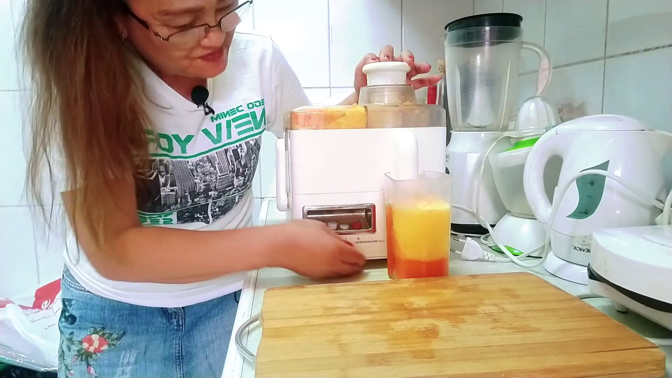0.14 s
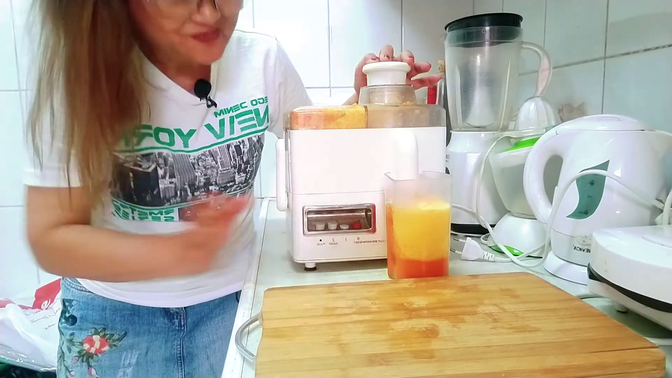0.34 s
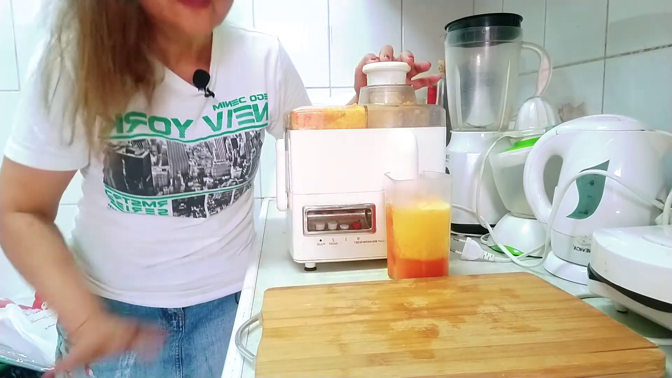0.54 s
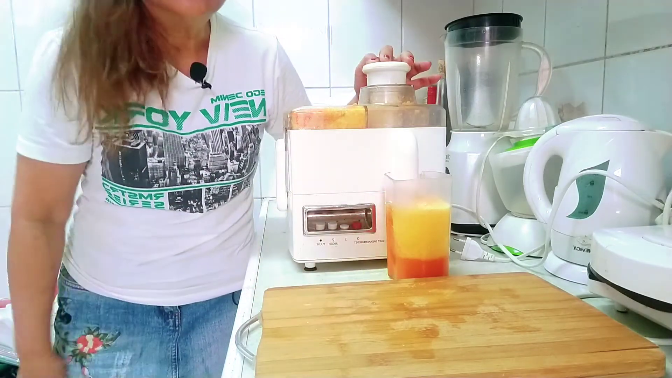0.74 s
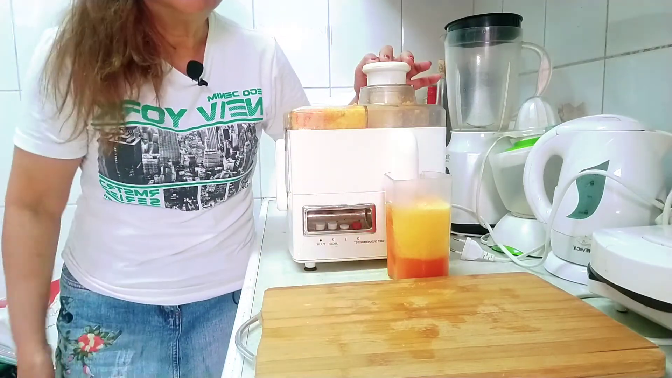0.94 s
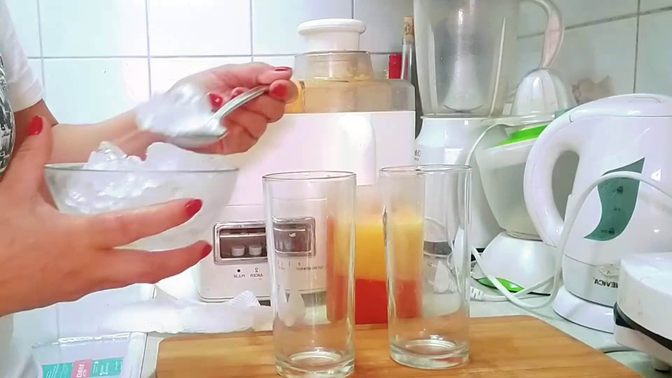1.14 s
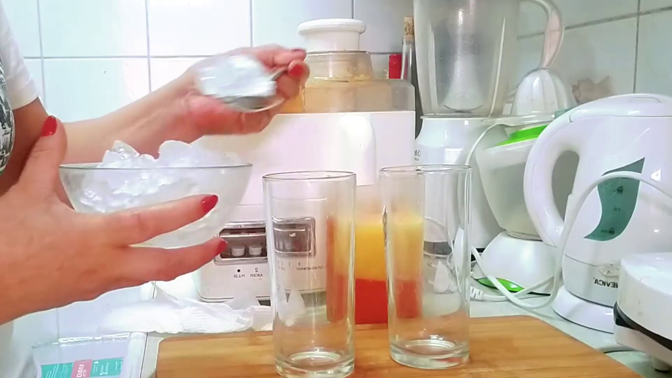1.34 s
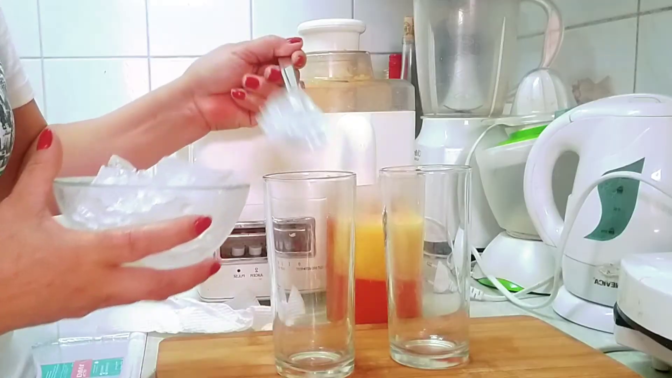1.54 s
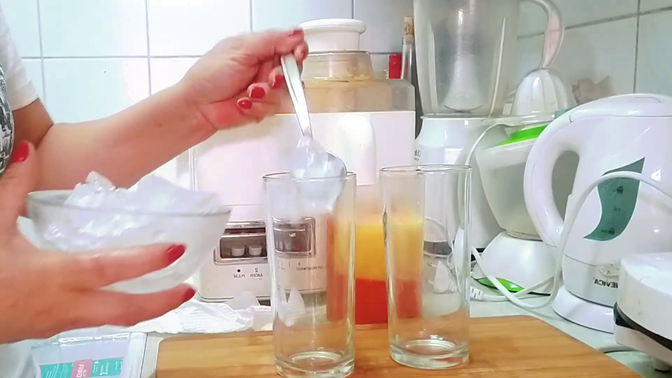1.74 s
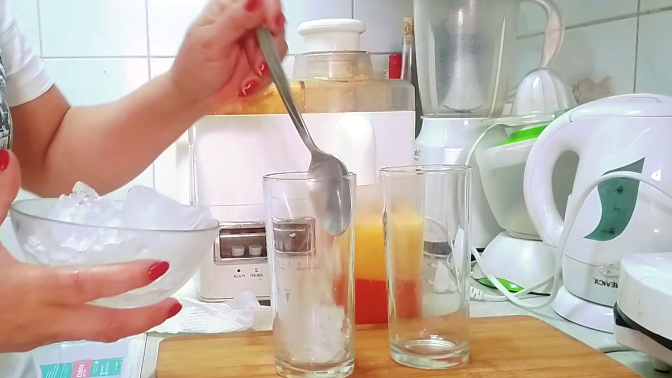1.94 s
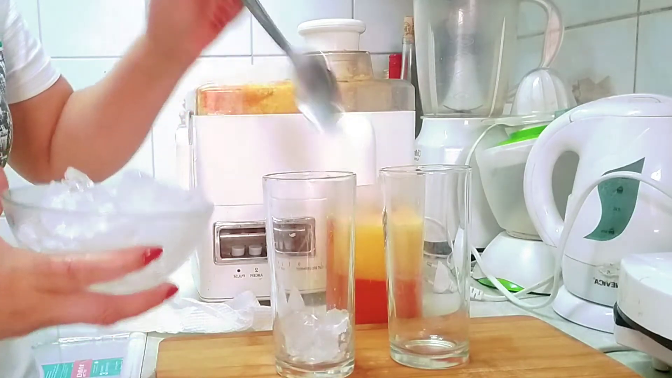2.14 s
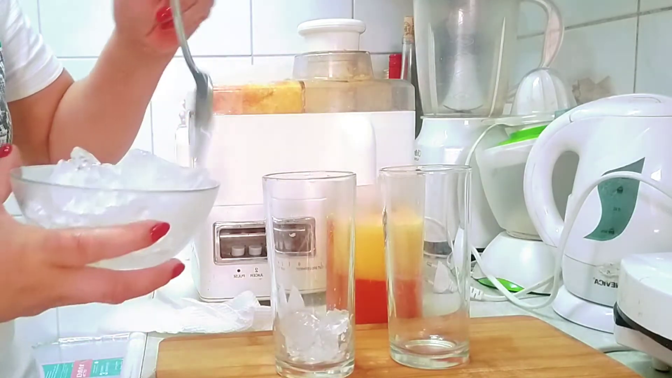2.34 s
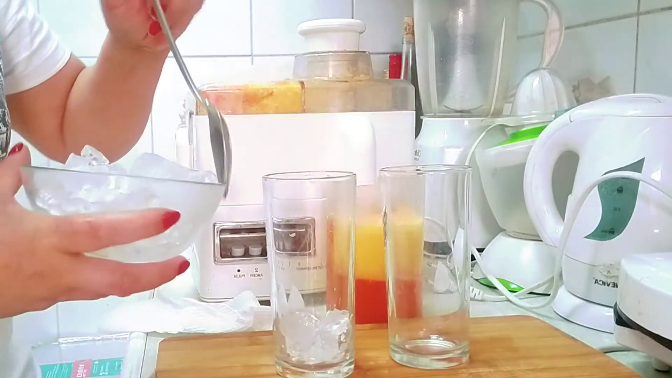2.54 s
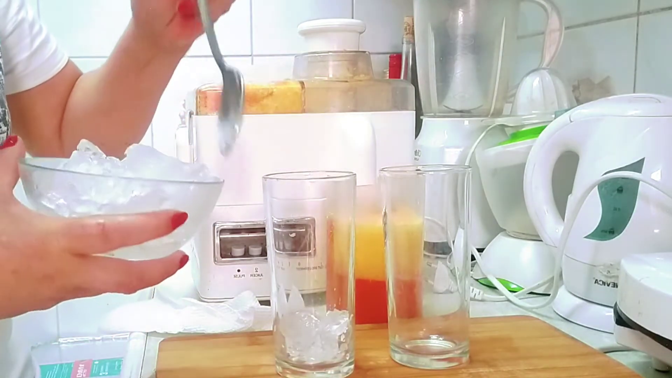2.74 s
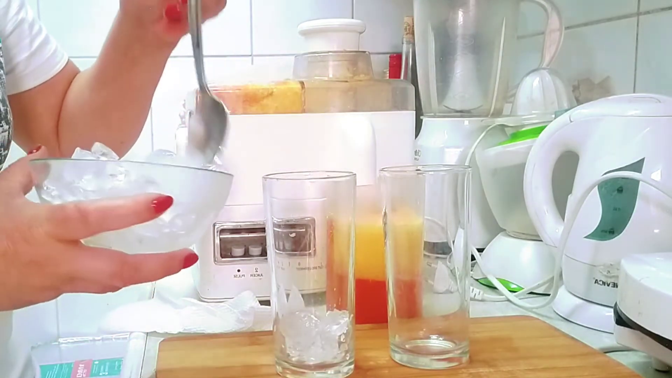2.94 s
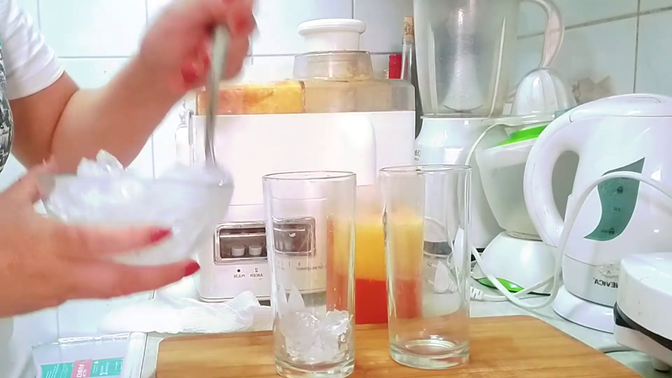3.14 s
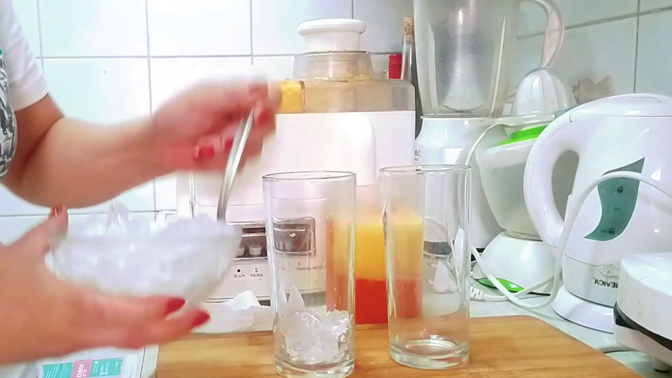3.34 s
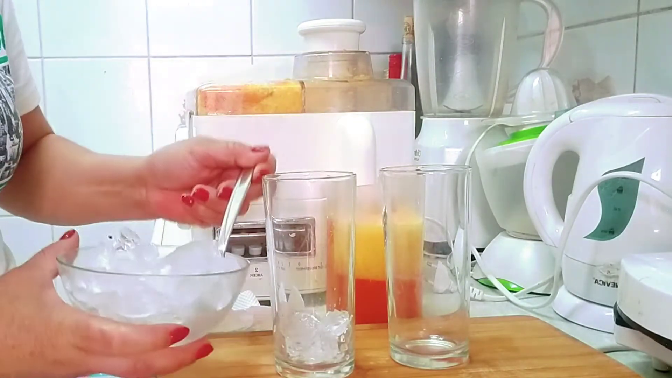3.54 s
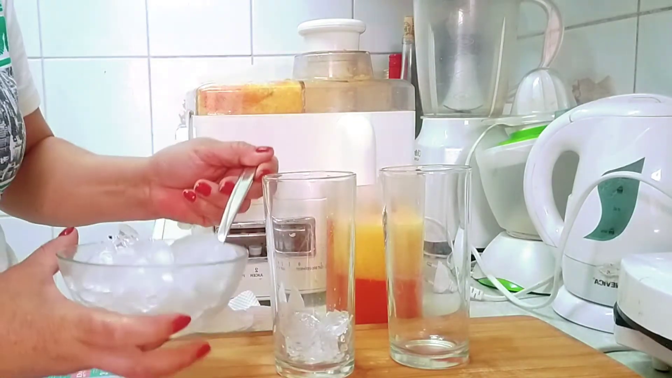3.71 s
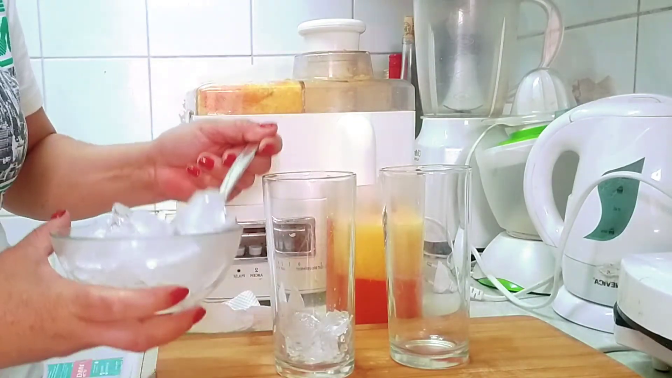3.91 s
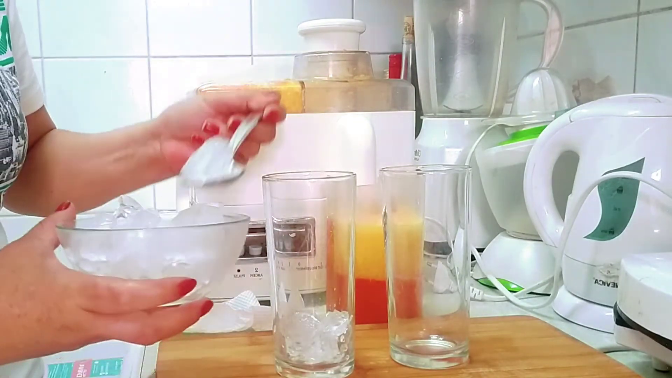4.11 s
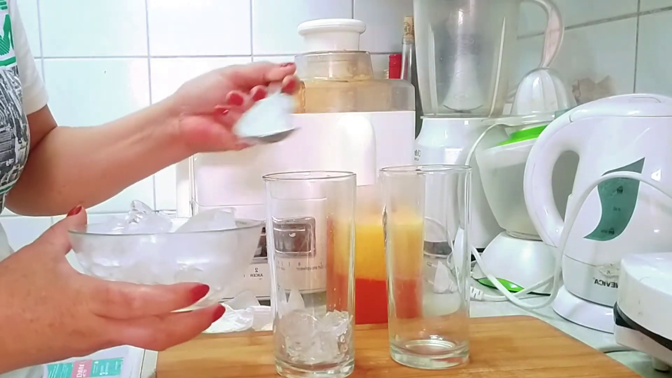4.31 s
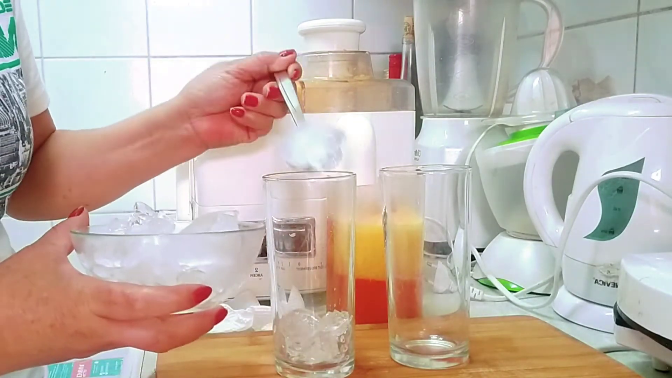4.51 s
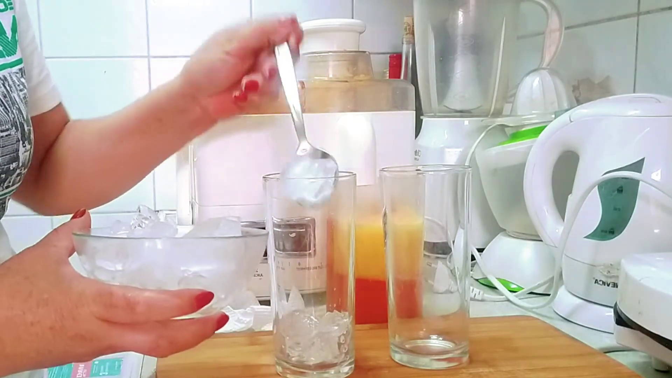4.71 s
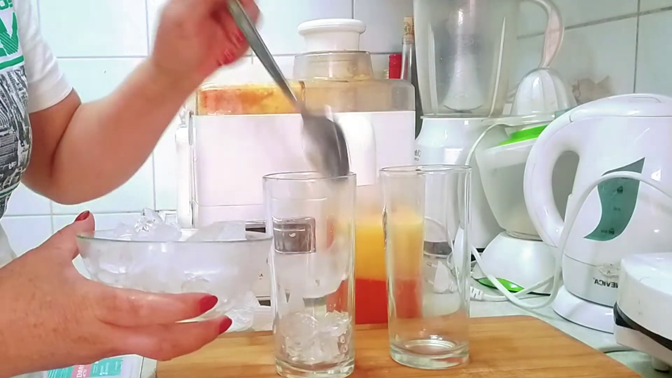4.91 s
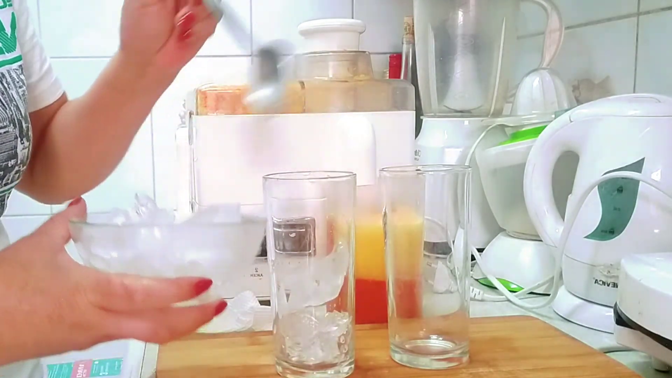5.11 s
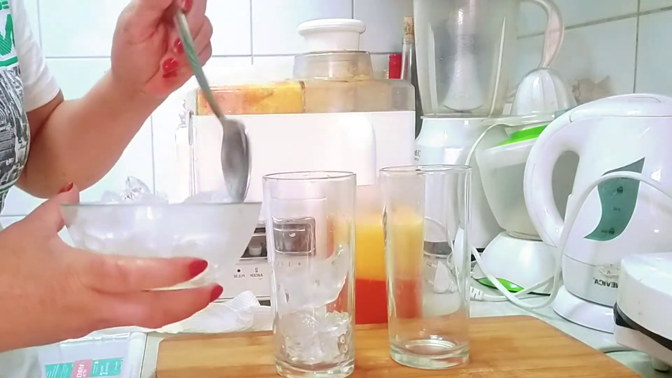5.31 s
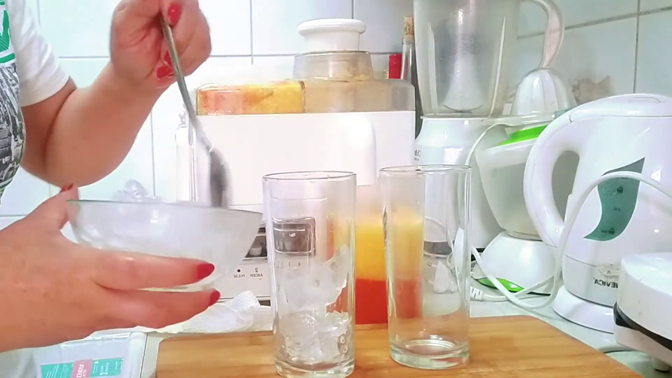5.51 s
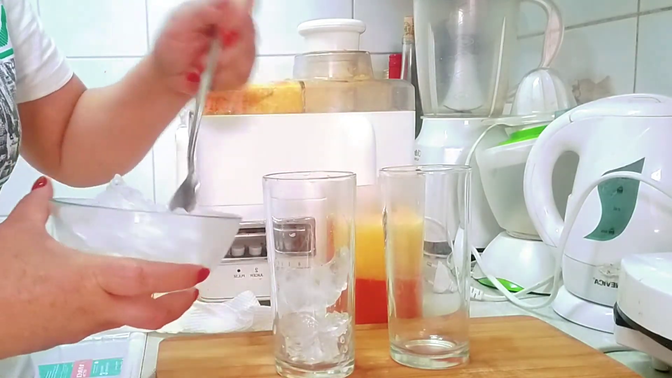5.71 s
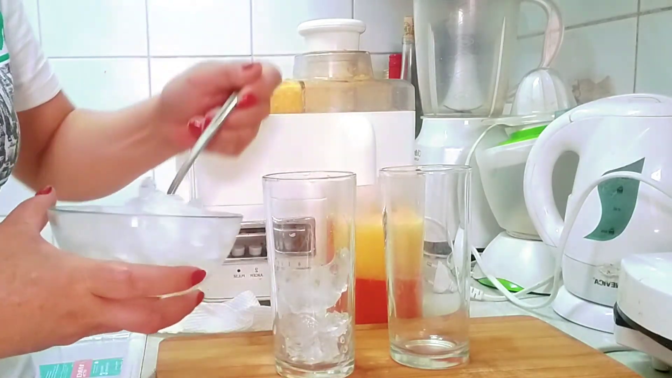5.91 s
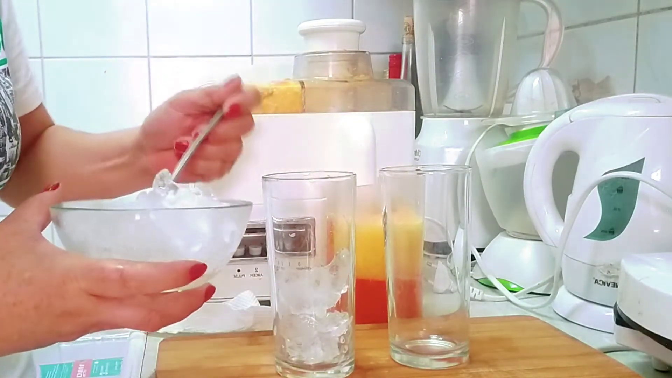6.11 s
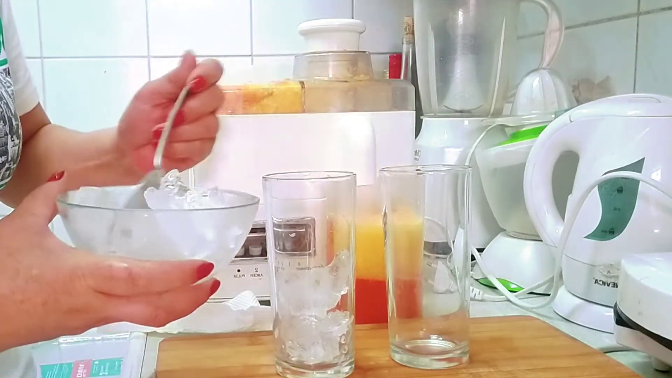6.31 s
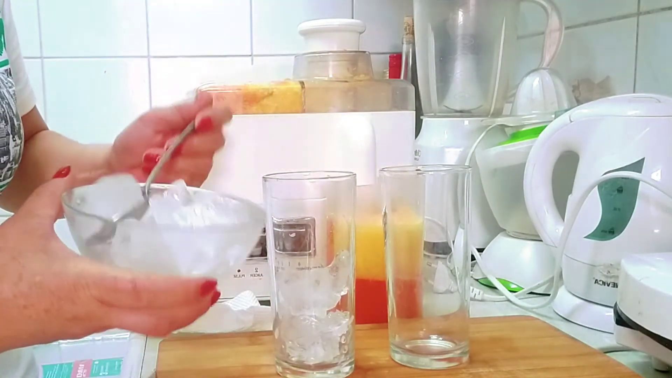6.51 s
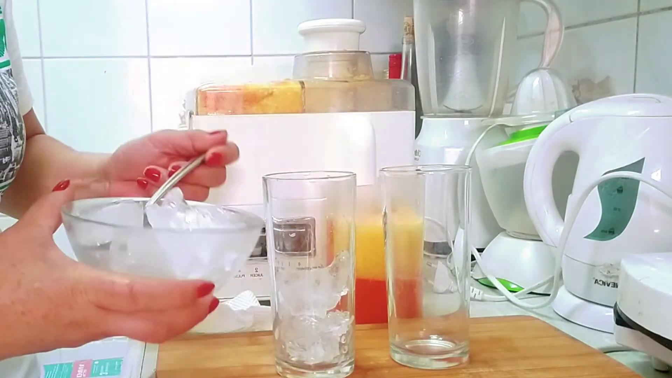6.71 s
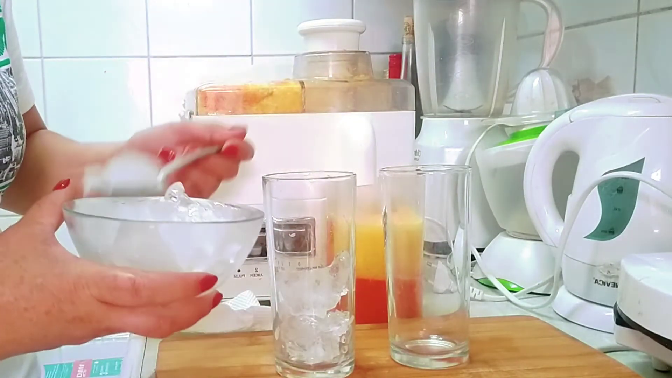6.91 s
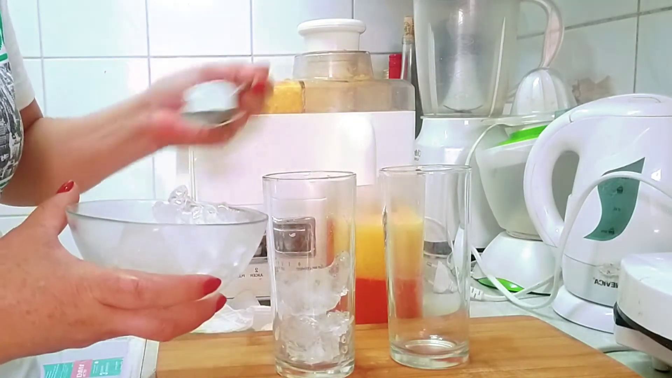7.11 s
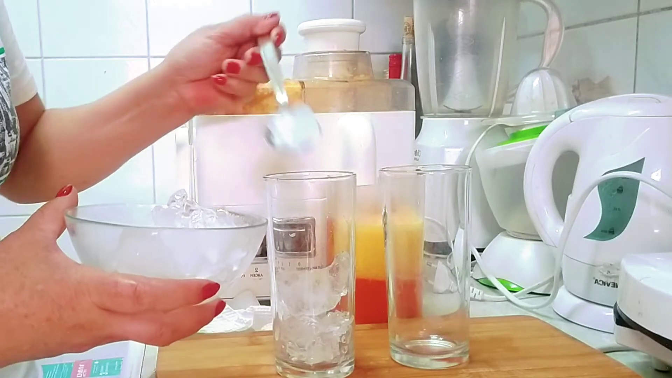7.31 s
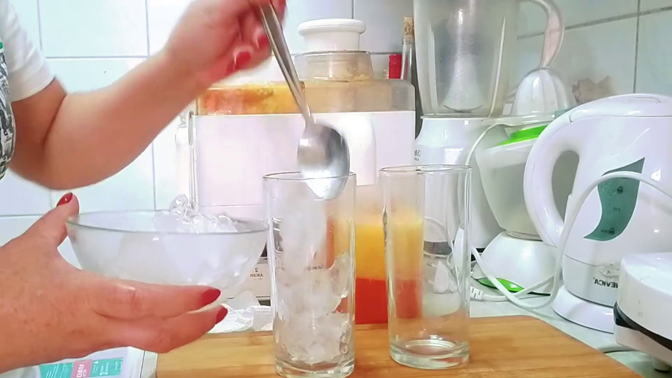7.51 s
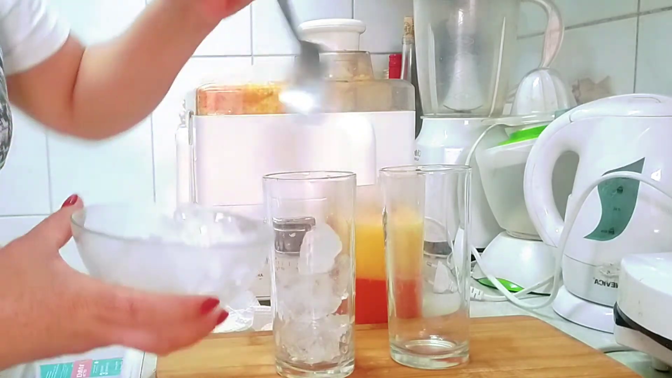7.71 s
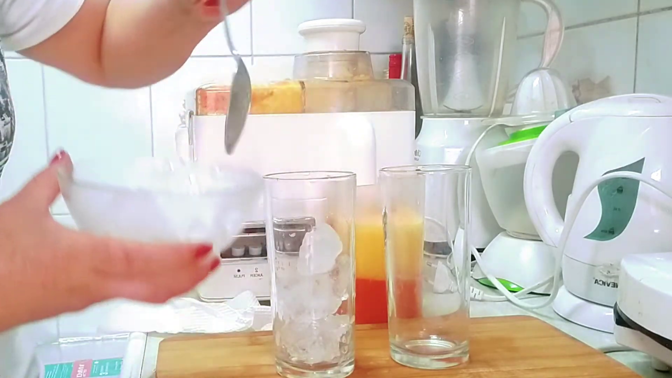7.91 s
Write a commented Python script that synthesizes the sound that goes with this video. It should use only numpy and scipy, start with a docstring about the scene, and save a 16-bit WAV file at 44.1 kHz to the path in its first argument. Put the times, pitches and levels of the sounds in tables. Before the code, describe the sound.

A juicer motor cuts off in a kitchen, followed by ice cubes rattling in a bowl and clinking into a glass three times.

```python
"""An electric juicer whines and churns on a kitchen counter, then falls silent all at once.
Its tones are harmonics of the shaft rotation, throbbing at twice the mains rate over rushing air.
A steel spoon then digs ice from a glass bowl and drops three spoonfuls into a tall tumbler.
Each impact cracks briefly and excites the modes of the glass, which ice against the wall damps.
The tiled kitchen adds a short bright tail and a faint steady background."""
import sys
import numpy as np
from scipy import signal
from scipy.fft import rfft, irfft, next_fast_len
from scipy.io import wavfile

SR = 44100
rng = np.random.default_rng(int(sys.argv[2]) if len(sys.argv) > 2 else 0)


def pcm_store(signal):
    """Save signal as 16-bit PCM."""
    levels = np.round(np.clip(np.atleast_2d(signal), -1, 1) * 32767)
    wavfile.write(sys.argv[1], SR, levels.astype(np.int16).T)


N = 350595
TIME = np.arange(N) / SR
RING_TIME = TIME[:24000]

# The juicer's run. Each row: time in seconds, machine and air levels in dB (used about their medians).
MOTOR_RUN = [(0.0, -35, -32), (0.03, -32.5, -33.5), (1.296, -33.5, -33), (1.35, -36, -34.5)]
# Motor tones; twelve rotor slots whine on multiples of 12.
# Each row: shaft order (rounded in use), level in dB, depth of the mains throb from 0 to 1.
SHAFT_HARMONICS = [(1.0004, -31.5, 0.05), (1.998, -49.5, 0.6), (3.01, -48.5, 0.9), (5.03, -71, 0.5),
                   (11.96, -40, 0.28), (24.06, -58, 0.2), (35.95, -46, 0.05), (50, -72, 0.9), (60, -64, 1.)]
# Mains hum and buzz of the housing. Each row: frequency in Hz, level in dB.
HOUSING_TONES = [(100.2, -46.5), (326.2, -54), (652.4, -53), (726.8, -51), (888.2, -47.5), (1011.5, -60),
                 (1063, -57), (1142.2, -46), (1482.5, -50.5)]
# Noise of the basket, its air and the room. Each row: frequency in Hz, relative density in dB.
CHURN_SPECTRUM = [(50, -28), (105, -8), (150, -12), (250, -3.5), (360, -11), (560, -8), (720, -3.5),
                  (1080, 2), (1320, -8), (2000, -11), (2600, -10), (3020, -14.5), (3300, -11), (3900, -30),
                  (6000, -31.5)]
AIR_SPECTRUM = [(2120, -36), (3600, -8.5), (4400, -9.5), (4830, -14), (5350, -10.5), (6050, -13),
                (7770, -9.5), (8060, -4), (8470, -9.5), (8730, -12), (10100, -15), (11100, -8), (12300, -8),
                (14900, -1), (15500, -2.5)]
ROOM_SPECTRUM = [(20, 1.5), (42, 5), (62, -14), (97, -1), (130, -3), (200, -7), (320, -11), (660, -14.5),
                 (900, -16), (1400, -19), (3200, -25), (5000, -36), (8200, -36), (15500, -32.5)]
# The room's hum. Each row: frequency in Hz, level in dB.
ROOM_HUM = [(46.3, -75), (95.8, -63), (191, -73.5), (289, -69), (813, -72.5)]
# Reverberation. Each row: frequency in Hz, time to decay by 60 dB (T60) in seconds.
KITCHEN_DECAY = [(150, 0.87), (1000, 0.55), (3000, 0.51), (8000, 0.45), (15000, 0.27)]
# Spoon and ice striking the tumbler.
# Each row: start in seconds, strength in dB, brightness in dB per octave, muting from 0 to 1.
TUMBLER_BLOWS = [(1.744, -16.5, -1, 0.2), (1.908, -35, 1.5, 0.93), (1.930, -27, -1, 0.3),
                 (1.984, -30, 1, 0.84), (2.053, -33.5, 4, 1), (2.065, -30, 6, 0.23), (2.087, -35, 3.5, 0.1),
                 (2.161, -40.5, 2, 0.9), (4.689, -19, -1, 0.36), (4.771, -28, -2, 0.37),
                 (4.842, -33, -2, 0), (4.886, -30, -1.5, 0.15), (4.928, -23.5, -0.5, 0.32),
                 (4.977, -32, -0.5, 0.28), (7.519, -24, 2, 0.7), (7.52, -30, 5.5, 0.68),
                 (7.573, -27.5, -2.5, 0.08), (7.585, -29.5, -2, 0.22), (7.596, -31.5, -3.5, 0.58),
                 (7.619, -31, -3, 0.05)]
# Modes of the tumbler, and of bowl and spoon.
# Each row: frequency in Hz, relative level in dB, nominal T60 in seconds.
TUMBLER_MODES = [(612, -24, .17), (2380, -12, .1), (2500, 1.5, .38), (2590, -10, .13), (2729, -11, .13),
                 (4385, -24, .2), (5680, -7, .14), (5729, -4, .45), (5780, -9, .2), (6195, -6, .36),
                 (6255, -11, .14), (9345, -10, .26), (10770, -12, .13), (11240, -6, .18), (11565, -7, .2),
                 (11685, -6, .11), (12800, -10, .13), (12965, -6, .17), (13070, -11, .17), (15233, 0, .2)]
BOWL_MODES = [(2110, -11, .16), (2225, 0, .27), (2450, -4, .2), (2821, -6, .18), (3950, -6, .22),
              (4107, -10, .2), (4344, -10, .2), (4820, -10, .22), (5995, -1.5, .28), (6130, -5, .22),
              (6638, -11, .25), (7219, -7, .25), (8400, -2, .3), (8570, -3, .32), (11735, -7, .3),
              (12670, -3, .3), (13770, -4, .2), (14400, -4, .2)]
# Noise of a contact, the board and sliding ice. Each row: frequency in Hz, relative density in dB.
CRACK_SPECTRUM = [(200, -6), (600, -8), (1200, -10.5), (2200, -4.5), (3300, -5.5), (5000, -8), (6200, -6),
                  (8300, -5), (9800, -15), (11500, -7.5), (14000, 1.5), (15500, -1.5)]
BOARD_SPECTRUM = [(40, -37), (72, 4), (130, -0.5), (180, -0.5), (260, -20.5), (450, -25), (900, -21.5),
                  (2000, -48.5)]
SLIDE_SPECTRUM = [(410, -62.5), (700, -12.5), (1520, -7.5), (1970, -8), (2460, -9), (2730, -7.5),
                  (5500, -22), (5940, -19), (8320, -13), (9980, -20.5), (15500, -9.5)]
# Short hollow notes of the tumbler's foot and of the cubes.
# Each row: start in seconds, frequency in Hz, level in dB.
CLUNKS = [(1.912, 1460, -44), (1.985, 1710, -38.5), (2.055, 667, -40.5), (2.067, 1660, -42.5),
          (2.158, 675, -42.5), (4.870, 607.5, -41), (7.520, 658, -38), (7.595, 1595, -31)]
# Cubes settling in the tumbler and stirred in the bowl.
# Each row: start in seconds, length in seconds, relative level in dB.
SETTLING_SPELLS = [(1.905, .25, -34), (4.84, .19, -41.5), (7.51, .19, -43)]
STIRRING_SPELLS = [(3.15, 1.22, -53.5), (5.58, 0.22, -54), (5.8, .36, -48.5), (6.3, 0.46, -54),
                   (7.0, .15, -56.5)]
# The spoon tapping the bowl. Each row: start in seconds, strength in dB, brightness in dB per octave,
# frequency in Hz that the struck spot favours.
SPOON_TAPS = [(2.466, -47.5, -6, 2160), (2.569, -32, -0.5, 2110), (2.778, -38.5, 2.5, 3980),
              (3.026, -49.5, -7, 2450), (3.206, -32, -0.5, 2090), (4.004, -37, 2.5, 2225),
              (5.363, -37, -2, 4200), (5.459, -32, 3.5, 6100), (6.216, -33.5, -4.5, 3840),
              (6.42, -44, -5.5, 2150), (6.607, -20.5, -1.5, 2350), (6.641, -24.5, -1.5, 5960),
              (6.970, -36.5, 4.5, 2040)]
# Cubes giving way. Each row: start in seconds, strength in dB, brightness in dB per octave.
ICE_CRUNCHES = [(3.072, -42, 0), (3.087, -23.5, 3.5), (3.677, -49.5, 3), (3.766, -46, -4), (3.876, -49, 3),
                (4.219, -40.5, -4.5), (5.532, -39.5, -0.5), (5.641, -48, 2), (5.675, -43.5, -5),
                (5.769, -48, -8.5), (5.84, -52.5, -11), (5.887, -32.5, -2), (5.978, -41, -0.5),
                (6.527, -41.5, -1.5), (6.568, -40.5, -5), (6.594, -44, 10), (6.705, -35.5, -2.5),
                (7.039, -50, -6.5), (7.241, -37, 2), (7.288, -38.5, -0.5)]
# How the filled bowl passes on a blow. Each row: frequency in Hz, gain in dB.
BOWL_RESPONSE = [(500, 0), (1400, 12.5), (2200, 13.5), (7000, 14), (13000, 10.5)]


def amp(db):
    """Amplitude grows tenfold with every 20 dB."""
    return 10 ** (np.asarray(db) / 20)


def unit(x):
    """Normalisation to an rms of 1."""
    return x / np.sqrt(np.mean(x ** 2) + 1e-20)


def read(points, hz):
    """Interpolation of (Hz, value) points on a log-frequency axis."""
    f, value = np.transpose(points)
    return np.interp(np.log(hz + 1), np.log(f + 1), value)


def colour(x, spectrum):
    """Minimum-phase filtering is causal, so clicks keep their sharp front."""
    size = next_fast_len(len(x) + 4096)
    hz = abs(np.fft.fftfreq(size, 1 / SR))
    log_gain = np.log(amp(np.maximum(read(spectrum, hz), -100)))
    response = np.exp(np.conj(signal.hilbert(log_gain)))[:size // 2 + 1]
    return irfft(rfft(x, size) * response, size)[:len(x)]


def drift(rate_hz):
    """Slow random fluctuation: low-passed noise of rms 1."""
    hz = np.fft.rfftfreq(N, 1 / SR)
    return unit(irfft(rfft(rng.standard_normal(N)) * np.exp(-(hz / rate_hz) ** 2), N))


def sine(turns):
    """Harmonic oscillation of rms 1 with a random initial phase."""
    return np.sqrt(2) * np.sin(2 * np.pi * (turns + rng.random()))


def add(mix, start_s, sound):
    """Superposition: a sound adds to the mix from its start time."""
    part = mix[max(round(start_s * SR), 0):][:len(sound)]
    part += sound[:len(part)]


def juicer(shaft_hz=226.1, mains_hz=50.1, silent_at_s=1.3943, fade_s=0.03):
    """Amplitude modulation: shaft harmonics and air throb at twice the mains rate over a churning basket."""
    times, machine_db, air_db = np.transpose(MOTOR_RUN)
    machine_gain, air_gain = (amp(np.interp(TIME, times, db - np.median(db)))
                              for db in (machine_db, air_db))
    turns = shaft_hz * TIME + 0.0034 * drift(1.7)
    throb = np.sin(2 * np.pi * 2 * mains_hz * TIME)
    flutter = 1 + 0.024 * drift(30)
    whine = flutter * sum(amp(db) * (1 + depth * throb) * sine(round(order) * turns)
                          for order, db, depth in SHAFT_HARMONICS)
    buzz = sum(amp(db) * sine(hz * TIME + 0.088 * drift(5.7)) for hz, db in HOUSING_TONES)
    # Reflections ripple both noise spectra.
    rumble, rush = (noise + 0.33 * kitchen_echo(noise) for noise in rng.standard_normal((2, N)))
    churn = amp(-32) * unit(colour(rumble, CHURN_SPECTRUM)) * (1 + 0.056 * drift(51))
    air = amp(-32.5) * unit(colour(rush, AIR_SPECTRUM)) * (1 + 0.036 * throb)
    running = np.clip((silent_at_s - TIME) / fade_s, 0, 1)
    return (machine_gain * (whine + buzz + churn) + air_gain * air) * running


def kitchen_echo(x, first_wall_s=0.0013):
    """Reverberation: dense reflections off the tiles decay exponentially, each band at its own rate."""
    hz, t, bands = signal.stft(rng.standard_normal(SR), SR, nperseg=256)
    decay = amp(-60 * t / read(KITCHEN_DECAY, hz)[:, None])
    tail = signal.istft(bands * decay, SR, nperseg=256)[1]
    tail *= TIME[:len(tail)] > first_wall_s
    return signal.fftconvolve(x, tail / np.linalg.norm(tail))[:N]


def room_tone(noise_db=-56.5):
    """Stationary noise lies under a hum that wavers by phase modulation."""
    hum = sum(amp(db) * sine(hz * TIME + 0.22 * drift(1.6)) for hz, db in ROOM_HUM)
    return amp(noise_db) * unit(colour(rng.standard_normal(N), ROOM_SPECTRUM)) + hum


def tumbler(thud_t60=0.5, bounce_db=-12):
    """Impact excitation: cubes ring the wall, thud through the foot into the board, bounce and settle."""
    out = np.zeros(N)
    for start, strength_db, brightness, muting in TUMBLER_BLOWS:
        add(out, start, clink(start, strength_db, brightness, muting))
        thud = unit(colour(rng.standard_normal(len(RING_TIME)), BOARD_SPECTRUM))
        thud_db = -41.5 + 0.37 * strength_db
        add(out, start, amp(thud_db - 60 * RING_TIME / thud_t60) * thud)
    for start, db in stray_contacts(SETTLING_SPELLS, count=4):
        add(out, start, clink(start, db + bounce_db, brightness=2, muting=0.85))
    for start, hz, db in CLUNKS:
        add(out, start, damped_note(hz, db, t60=0.1))
    return out + jostle(SETTLING_SPELLS, CRACK_SPECTRUM, ticks_per_s=400, spread_db=7, tick_t60=0.07)


def clink(start_s, strength_db, brightness, muting, spoonful_s=2.9, muted_crack_db=17):
    """Contact damping: ice against the wall shortens and detunes the ring and strengthens the crack."""
    # Filling shortens the ring further and chokes the modes near 5780 Hz.
    fill = (start_s - TUMBLER_BLOWS[0][0]) / spoonful_s
    sustain = (0.91 - 0.51 * muting) * 0.85 ** fill
    wall_response = [(600, -1.5), (2600, -4.5), (5780, -9 - 5 * fill), (6190, -3.5), (9300, -3.5)]
    modes = [(hz, db + read(wall_response, hz), t60 * sustain) for hz, db, t60 in TUMBLER_MODES]
    drive = blow_spectrum(strength_db, brightness)
    sound = ring(modes, drive, scatter_db=1.5, detune=0.0009 + 0.0062 * muting, beating=0.6)
    contact = colour(crack(t60=0.043), [(8000, -1), (13000, -3)])
    add(sound, 0, colour(contact, blow_spectrum(strength_db + muted_crack_db * muting, brightness)))
    return sound


def blow_spectrum(strength_db, brightness, pivot_hz=5500):
    """Spectral tilt: a contact leans to the treble by its brightness, in dB per octave."""
    hz = np.array([2200, 14000])
    return np.transpose([hz, strength_db + brightness * np.log2(hz / pivot_hz)])


def ring(modes, drive, scatter_db, detune, beating):
    """Modal superposition: the blow's spectrum and its landing spot set each decaying mode's level."""
    freqs, levels, t60s = np.transpose(modes)
    levels = levels + read(drive, freqs) + scatter_db * rng.standard_normal(len(freqs))
    freqs = freqs * (1 + detune * rng.standard_normal(len(freqs)))
    # Moving ice and near reflections make each mode swell and dip.
    knots = np.arange(0, RING_TIME[-1], 0.009)
    swells = (1 + beating * rng.standard_normal((len(freqs), len(knots)))) / np.hypot(1, beating)
    return sum(np.interp(RING_TIME, knots, swell * amp(db - 60 * knots / t60)) * sine(hz * RING_TIME)
               for hz, db, t60, swell in zip(freqs, levels, t60s, swells))


def crack(t60, lumps_db=4, rise_s=0.0012):
    """Modal overlap: the dense, short-lived modes of ice merge into noise, uneven for each cube."""
    t = RING_TIME[:6000]
    hz = np.geomspace(200, 16000, 48)
    db = read(CRACK_SPECTRUM, hz) + lumps_db * rng.standard_normal(len(hz))
    envelope = amp(-60 * t / t60) * (1 - np.exp(-t / rise_s))
    return colour(rng.standard_normal(len(t)) * envelope, np.transpose([hz, db]))


def jostle(spells, spectrum, ticks_per_s, spread_db, tick_t60, arch_power=0.26):
    """Shot noise: wet cubes slip in many tiny random ticks; each spell swells and dies away."""
    ticks = (rng.random(N) < ticks_per_s / SR) * amp(spread_db * np.minimum(rng.exponential(1, N), 3.5))
    envelope = signal.lfilter([1], [1, -amp(-60 / (tick_t60 * SR))], ticks)
    grit = unit(colour(envelope * rng.standard_normal(N), spectrum))
    effort = np.zeros(N)
    for start, length, db in spells:
        arch = np.sin(np.pi * np.arange(0, length, 1 / SR) / length) ** arch_power
        add(effort, start, amp(db) * arch)
    return effort * grit


def stray_contacts(spells, count):
    """Light contacts fall uniformly at random within each spell and take its level."""
    return [(start + length * share, db) for start, length, db in spells for share in rng.random(count)]


def damped_note(hz, db, t60):
    """A single damped mode is an exponentially decaying sinusoid."""
    return amp(db - 60 * RING_TIME / t60) * np.sqrt(2) * np.sin(2 * np.pi * hz * RING_TIME)


def bowl(bowl_note_hz=2400):
    """Impact and friction: the spoon taps the glass, breaks cubes loose and nudges them along."""
    out = np.zeros(N)
    for start, strength_db, brightness, hz in SPOON_TAPS:
        ring_db = -26.5 + 0.17 * strength_db  # a harder tap gains more ring than crack
        add(out, start, knock(strength_db, brightness, ring_db, hz))
    for start, strength_db, brightness in ICE_CRUNCHES:
        add(out, start, knock(strength_db, brightness, ring_db=-36, favoured_hz=bowl_note_hz))
    for start, db in stray_contacts(STIRRING_SPELLS, count=3):
        add(out, start, knock(db - 5, brightness=-3, ring_db=-24, favoured_hz=bowl_note_hz))
    sliding = jostle(STIRRING_SPELLS, SLIDE_SPECTRUM, ticks_per_s=2000, spread_db=8, tick_t60=0.018)
    return out + amp(-1.5) * sliding


def knock(strength_db, brightness, ring_db, favoured_hz, boost_db=6, span=0.051):
    """Damping by hand and ice leaves a blow in the bowl a crack, a short note and a little ring."""
    contact = blow_spectrum(strength_db, brightness)
    drive = [(hz, db + read(contact, hz)) for hz, db in BOWL_RESPONSE]
    # Modes near the favoured frequency ring harder.
    modes = [(hz, db + boost_db * np.exp(-(np.log(hz / favoured_hz) / span) ** 2), t60)
             for hz, db, t60 in BOWL_MODES]
    sound = amp(ring_db) * ring(modes, drive, scatter_db=2, detune=0.003, beating=1)
    add(sound, 0, colour(crack(t60=0.037), drive))
    return sound + damped_note(favoured_hz, read(contact, favoured_hz) - 3, t60=0.023)


def scene(tumbler_wet_db=-7, bowl_wet_db=-4):
    """Direct and reflected sound superpose at one point, alike in both channels."""
    drops, digging = tumbler(), bowl()
    echo = kitchen_echo(amp(tumbler_wet_db) * drops + amp(bowl_wet_db) * digging)
    mono = juicer() + drops + digging + echo + room_tone()
    return np.array([mono, mono])


def record(dry, cutoff_hz=15620):
    """Band limiting: a steep low-pass filter removes the highest treble."""
    low_pass = signal.firwin(801, cutoff_hz, window=("kaiser", 9), fs=SR)
    return signal.oaconvolve(dry, low_pass[None], "same", axes=1)


dry = scene()
out = record(dry)
pcm_store(out)
```